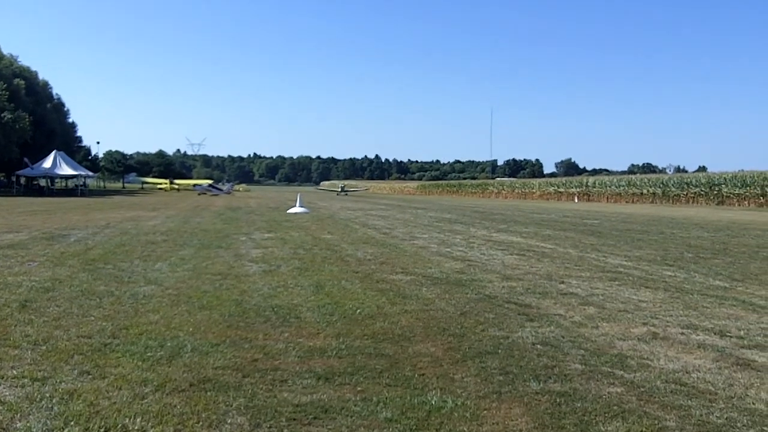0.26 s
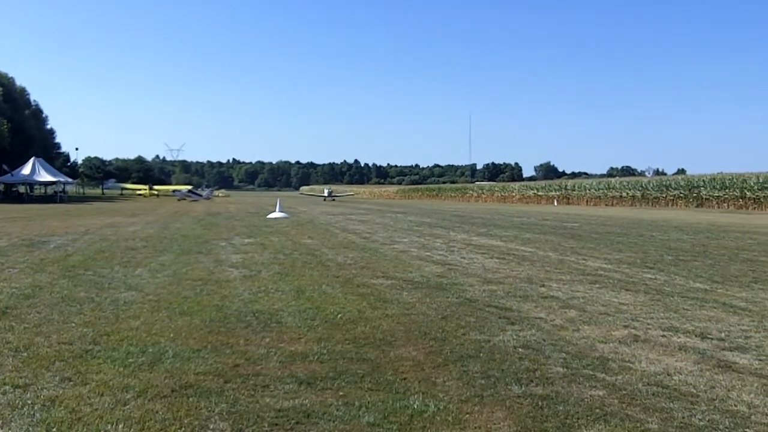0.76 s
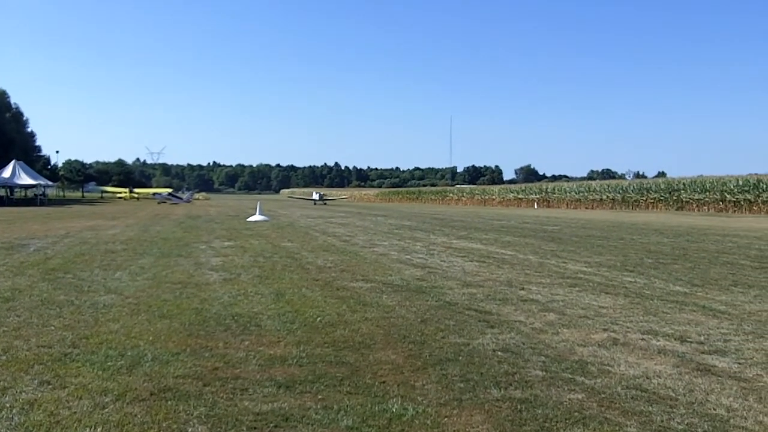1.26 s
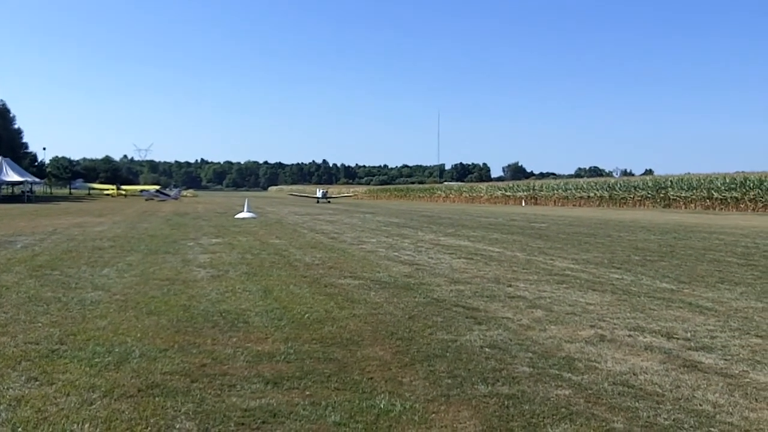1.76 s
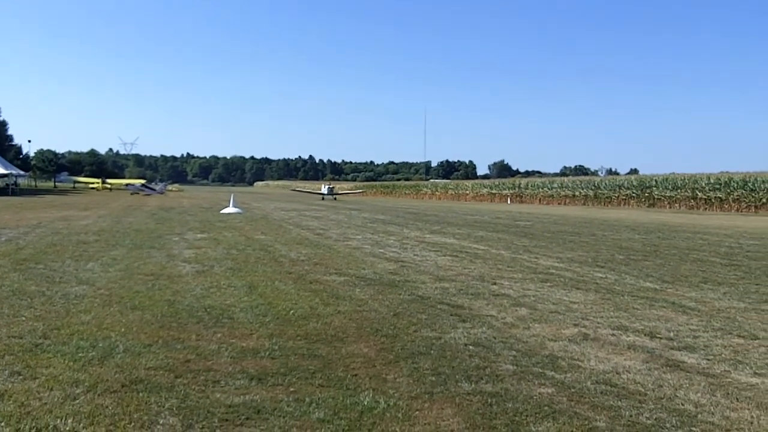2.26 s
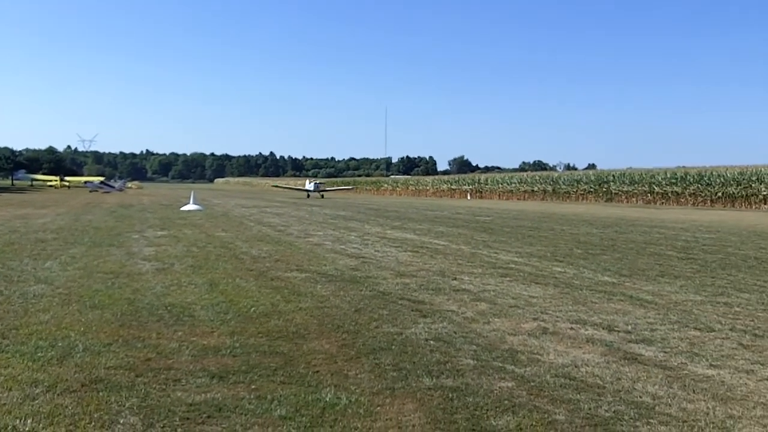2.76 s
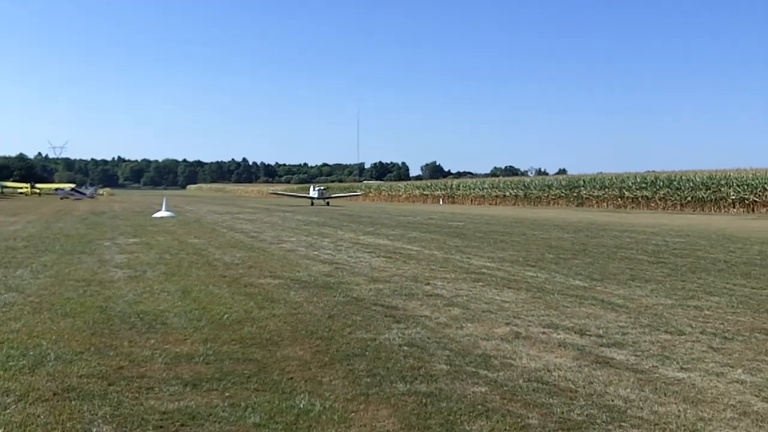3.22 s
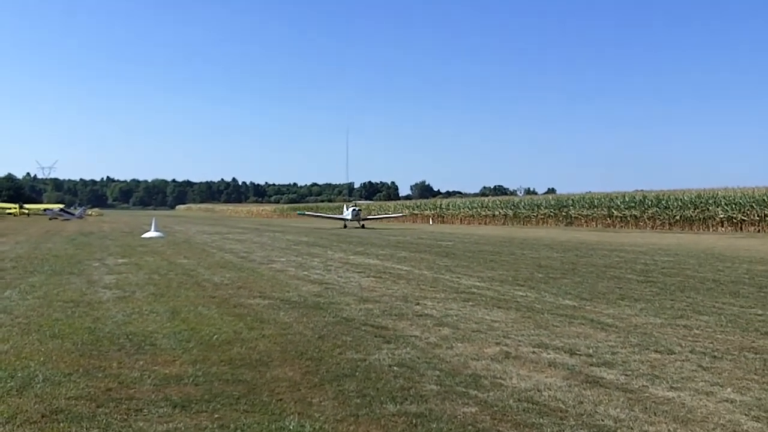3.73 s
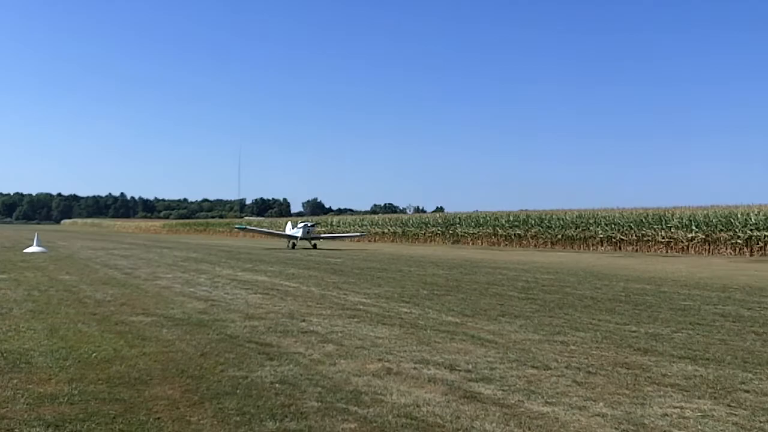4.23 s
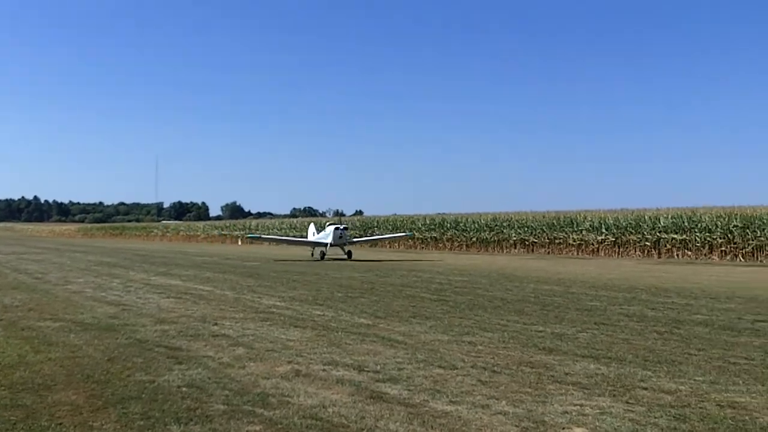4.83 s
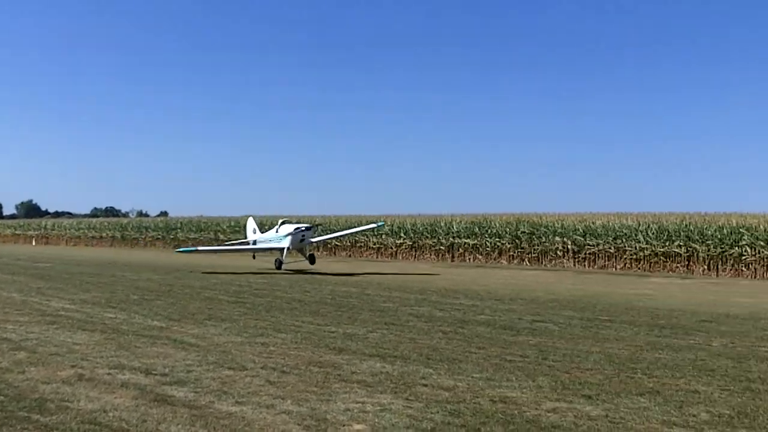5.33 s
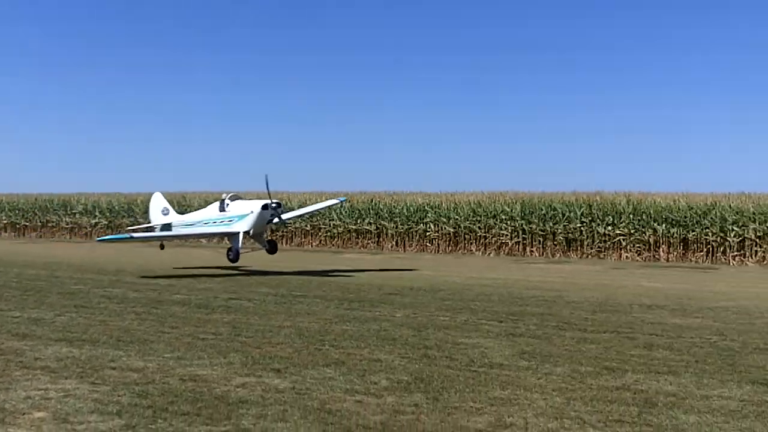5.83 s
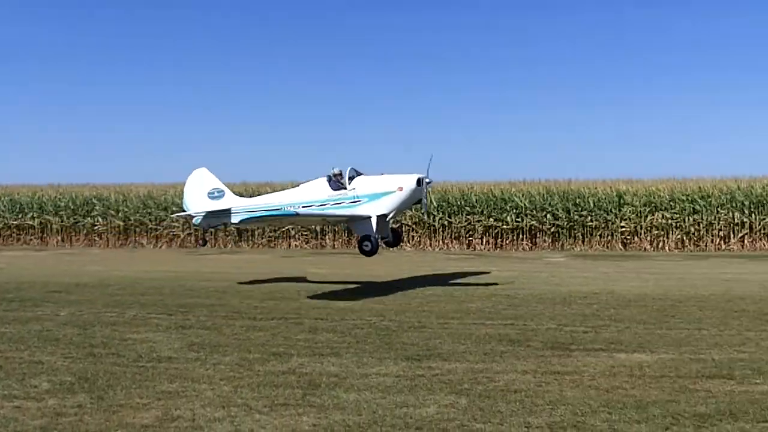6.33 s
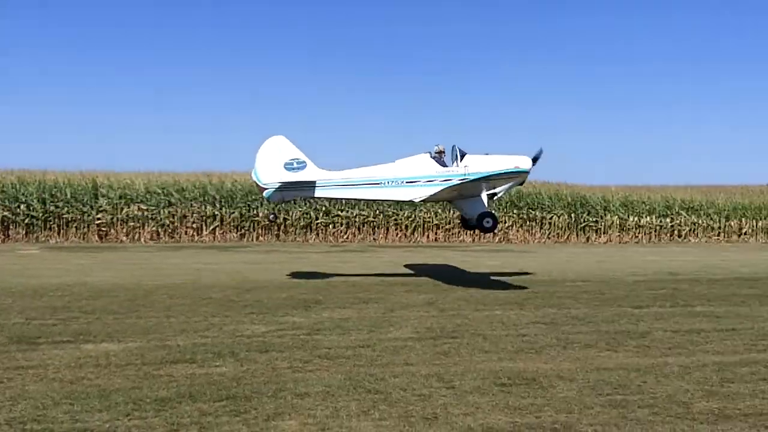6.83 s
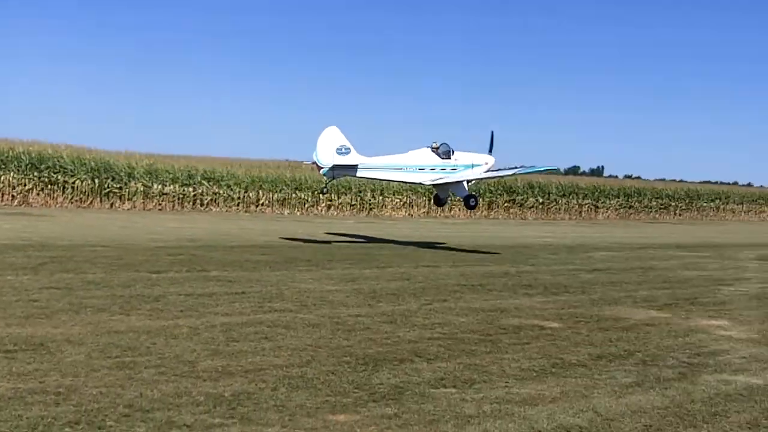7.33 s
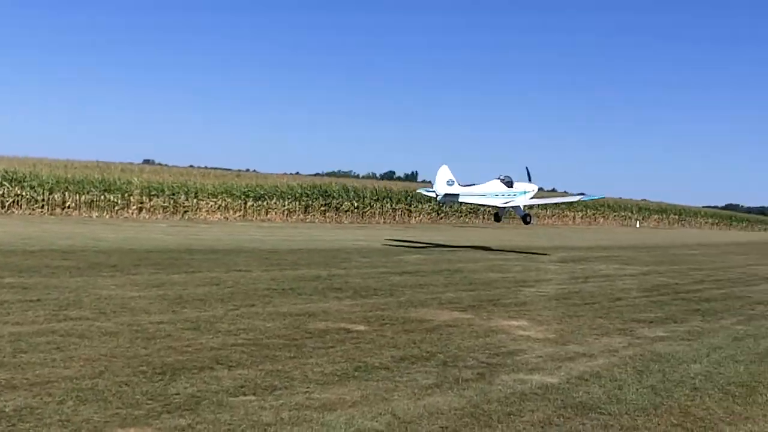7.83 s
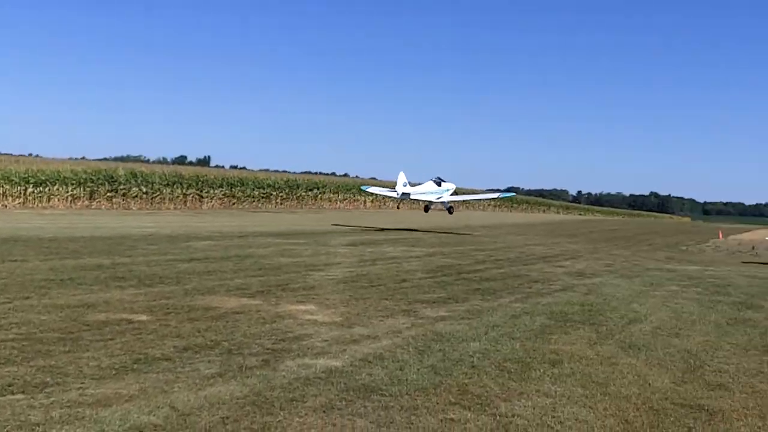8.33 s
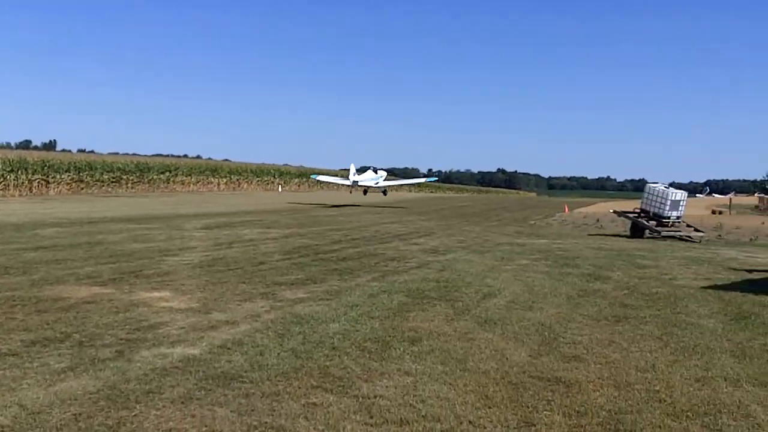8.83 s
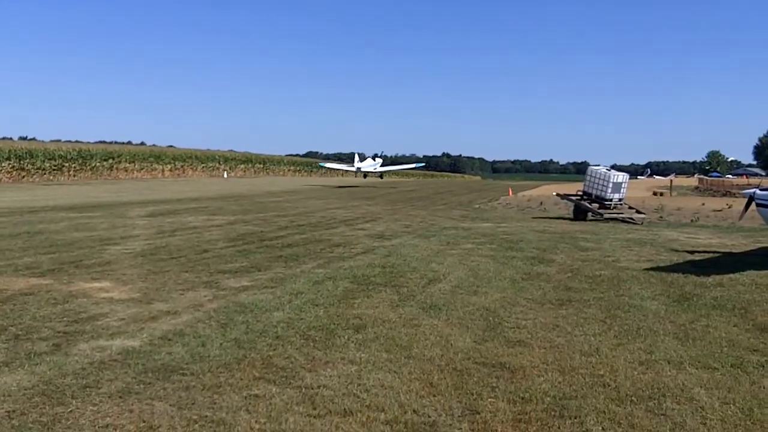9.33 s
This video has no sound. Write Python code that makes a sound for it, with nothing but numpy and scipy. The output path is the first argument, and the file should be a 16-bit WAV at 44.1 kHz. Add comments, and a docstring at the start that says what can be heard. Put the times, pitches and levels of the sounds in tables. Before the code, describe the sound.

Wind buffets the microphone as a light piston aircraft takes off, its buzzing engine swelling to a raspy pass, then receding with sharp exhaust cracks.

```python
"""A light propeller plane takes off from a grass strip, passes close by and climbs away.
Its four-cylinder engine drones in sine orders of the firing rate and rasps in puffs of filtered noise,
dropping in pitch as it passes; from behind, the open exhaust cracks in short shocks.
Wind rumbles and buffets on the microphone as shaped noise, and ticks sound close to it.
The propeller wash hits the microphone just after the pass."""
import sys
import numpy as np
from scipy import signal
from scipy.io import wavfile
from scipy.ndimage import uniform_filter1d, map_coordinates

SR = 44100
rng = np.random.default_rng(int(sys.argv[2]) if len(sys.argv) > 2 else 0)


def wav_out(sig):
    """Save sig, one row per channel (or a flat mono array), as 16-bit PCM at SR to the path in sys.argv[1]."""
    wavfile.write(sys.argv[1], SR, np.round(np.clip(np.atleast_2d(sig).T, -1, 1) * 32767).astype(np.int16))


N = 422037
TIME = np.arange(N) / SR

# Exhaust drone, swelling and fading on the wind.
# Each row: time in seconds, relative level of the firing tone in dB.
DRONE_SWELL = [(0, -26), (0.7, -30.5), (1.25, -22), (2.2, -27), (2.55, -20.5), (3, -20), (3.25, -22.5),
               (4.3, -22.5), (4.7, -30), (5, -25), (5.55, -23), (5.8, -26), (6.2, -23), (6.9, -22.5),
               (7.4, -29.5), (8, -28), (8.6, -30), (9.57, -27)]
# The four cylinders in firing order.
# Each row: relative strength heard from ahead in dB, from behind in dB.
CYLINDER_DB = [(2.5, 1), (-3, -3), (1, -3), (-1.5, -8)]
REST_HZ = 71  # firing rate that places the engine harmonics among the pipe resonances
NOTCH_HZ = 5500  # the microphone's notch, and where the treble of the rasp begins


def amp(db):
    """Turns decibels into a linear gain."""
    return 10 ** (np.asarray(db) / 20)


def evened(x):
    """Brings a sound to unit rms level."""
    return x / np.sqrt(np.mean(x ** 2) + 1e-20)


def steadied(x, size=10000):
    """Holds a sound at unit level over about size samples."""
    power = uniform_filter1d(uniform_filter1d(x ** 2, size), size // 2)
    return x / np.sqrt(abs(power) + 1e-12)


def follow(rows):
    """Each column of a curve, sample by sample."""
    s, *columns = np.transpose(rows)
    return [np.interp(TIME, s, column) for column in columns]


def add(mix, s, sound):
    """Lays a short sound into the mix at s seconds."""
    part = mix[max(round(s * SR), 0):][:len(sound)]
    part += sound[:len(part)]


def band(x, hz, kind, order=2):
    """Butterworth filter of the given kind."""
    return signal.sosfilt(signal.butter(order, hz, kind, fs=SR, output="sos"), x)


def drift(hz):
    """Slow chance of unit size: a smooth curve through random knots, two to each period of hz."""
    knots = rng.standard_normal(4096)
    coarse = map_coordinates(knots, [TIME[::64] * hz * 2], order=3, mode="wrap")
    return evened(coarse).repeat(64)[:N]


def colour(x, points, size=16384):
    """Causal minimum-phase filter with the given spectrum."""
    f, db = np.transpose(points)
    log_hz = np.log(abs(np.fft.fftfreq(size, 1 / SR)) + 1)
    log_gain = np.log(amp(np.interp(log_hz, np.log(f), db)))
    spectrum = np.exp(np.conj(signal.hilbert(log_gain)))
    taps = np.fft.ifft(spectrum).real[:size // 2]
    return signal.oaconvolve(x, taps)[:len(x)]


def flight(pass_s=6.98, speed_m_per_s=22.5, miss_m=14.6):
    """A straight line past the listener: distance in m and aspect (0 nose, 1 side, 2 tail)."""
    along = speed_m_per_s * (TIME - pass_s)
    return np.hypot(along, miss_m), np.arctan2(miss_m, -along) / (np.pi / 2)


def seen(aspect, views):
    """Blends values spaced evenly from the nose round to the tail."""
    return np.interp(aspect, np.linspace(0, 2, len(views)), views)


def engine_turns():
    """Firings counted so far, the running sum of the firing rate."""
    # Firing rate as heard, with the Doppler fall. Each row: time in seconds, rate in Hz.
    firing_rate = [(0.0, 74.83), (1.0, 75.22), (2.0, 75.26), (3.0, 75.5), (4.0, 75.58), (5.0, 75.43),
                   (5.6, 75.7), (6.1, 74.91), (6.5, 73.22), (6.9, 70.43), (7.3, 68.36), (7.7, 67.79),
                   (8.2, 67.15), (8.8, 66.7), (9.57, 66.52)]
    return np.cumsum(follow(firing_rate)[0]) / SR - .57


def firings(turns, aspect, scatter_db=2.5):
    """Strength of the current firing: the cylinders are uneven, more so from behind."""
    firing = np.floor(turns).astype(int)
    ahead_db, behind_db = np.array(CYLINDER_DB)[firing % len(CYLINDER_DB)].T
    cylinder_db = ahead_db + (behind_db - ahead_db) * np.clip(aspect - 1, 0, 1)
    return amp(cylinder_db + scatter_db * rng.standard_normal(1024)[firing])


def ground(x, soft_hz=350, dull_hz=7800):
    """The grass returns an inverted copy, latest near the pass; its comb sweeps down and up again."""
    # Echo off the grass after lift-off.
    # Each row: time in seconds, first null of its comb in Hz, strength 0 to 1.
    grass_echo = [(5.8, 5200, 0), (6.1, 3630, 0.02), (6.35, 2600, 0.17), (6.6, 1710, 0.3), (7.0, 1350, 0.3),
                  (7.25, 1400, 0.36), (7.5, 1610, 0.4), (7.8, 2130, 0.23), (8.0, 2760, 0.51),
                  (8.3, 4170, 0.4), (8.6, 5740, 0.22), (9.57, 7950, 0.06)]
    null_hz, share = follow(grass_echo)
    echo = signal.filtfilt(*signal.butter(1, [soft_hz, dull_hz], "band", fs=SR), x)
    delayed = map_coordinates(echo, [(TIME - 1 / null_hz) * SR], order=3)
    return x - share * delayed


def drone(turns, aspect, level_db=-0.05, waver=0.069, overtone_waver=0.17, lag=0.37):
    """Low engine orders as wavering sines; the second swells as the pipes come to face the listener."""
    # Each row: multiple of the firing rate, level ahead of the plane in dB, level behind it in dB.
    orders = [(.5, -41, -41), (1, 0, -0.5), (1.5, -16.5, -24), (2, -14, 2), (2.5, -30, -11.5),
              (3, -31.5, -7), (3.5, -43, -26.5), (4, -39.5, -28)]
    behind = np.clip(aspect - 1, 0, 1)
    out = np.zeros(N)
    for multiple, ahead_db, behind_db in orders:
        depth = waver if multiple == 1 else overtone_waver
        unsteady = 1 + depth * (drift(4.5) + 1j * drift(5.9))
        tone = (unsteady * np.exp(2j * np.pi * multiple * (turns - lag))).real
        out += amp(ahead_db + (behind_db - ahead_db) * behind) * tone
    return np.sqrt(2) * out * amp(follow(DRONE_SWELL)[0] + level_db)


def pipes(turns, aspect, distance, half_orders_db=-5, throb=0.63, lag=0.26, wander_db=1.8, count=46):
    """Engine harmonics, lifted by the pipes, glide with the Doppler fall; uneven firing and air blur them."""
    # Resonances of the exhaust pipes with the engine firing at REST_HZ.
    # Each row: centre in Hz, width in Hz, loss over the grass in dB per m,
    # then dB against the drone every 30 degrees from nose to tail.
    pipe_modes = [(400, 110, 0.054, -37, -33, -30, -38, -34, -33, -41),
                  (550.5, 118, 0.063, -23.5, -24.5, -20.5, -27, -18, -16, -27),
                  (676, 150, 0.074, -37.5, -31, -20, -25, -30, -24, -42),
                  (1000, 168, 0, -34.5, -24, -19, -18.5, -15.5, -13.5, -20.5),
                  (1540, 370, 0, -36.5, -28.5, -23, -25, -18, -18.5, -30)]
    near = np.clip(aspect, 0, 1)
    drone_db = follow(DRONE_SWELL)[0]
    levels = amp([drone_db + seen(aspect, views) - loss * distance + wander_db * drift(0.99)
                  for _, _, loss, *views in pipe_modes])

    # share of each harmonic in each resonance, from 4.5 times the firing rate upwards in halves
    multiples = (9 + np.arange(count)) / 2
    hz, width = np.transpose(pipe_modes)[:2]
    off_centre = (multiples[:, None] * REST_HZ - hz) / width
    lift = amp(half_orders_db * (multiples % 1 > 0))[:, None] / (1 + off_centre ** 2) ** 2
    lift = lift / np.linalg.norm(lift, axis=0)

    half_turn = np.exp(1j * np.pi * turns)
    harmonic = np.exp(8j * np.pi * turns)
    out = np.zeros(N)
    for multiple, weights in zip(multiples, lift):
        harmonic = harmonic * half_turn
        # higher harmonics are less pure and flicker faster
        clean = np.minimum((4.3 + 2.2 * near) / multiple, .8)
        blur_hz = 10 + 1.8 * multiple
        steady = clean * np.exp(2j * np.pi * rng.random())
        blur = np.sqrt((1 - clean ** 2) / 2) * (drift(blur_hz) + 1j * drift(blur_hz))
        out += (weights @ levels) * ((steady + blur) * harmonic).real
    # close by and from behind, the single firings stand out
    return np.sqrt(2) * out * (1 + throb * near * np.cos(2 * np.pi * (turns - lag)))


def jets(turns, aspect, sharpness=1.96, low_hz=5500, scatter_db=2.5):
    """Every firing spits a bright jet of gas; uneven cylinders chop the hiss once an engine cycle."""
    # Each row is one cylinder in firing order: relative dB every 30 degrees from nose to tail.
    cylinder_jets = [(2, 5, 2, -7.5, -11, 1.5, 2), (-1, 1.5, 2, -9, -8, 0.5, 3),
                     (-1, -0.5, -3, 2, 2, -2, -7), (0, 0, 1, 3, 4.5, -1.5, 0)]
    # Relative level of all the jets in dB, every 30 degrees from nose to tail.
    jet_level = (-11.5, -1, 2, 4.5, 4.5, 0.5, -7)
    # How long a jet trails its firing in firing periods, every 30 degrees from nose to tail.
    jet_lag = (0.32, 0.41, 0.34, 0.13, 0.035, .2, .2)
    own = turns - seen(aspect, jet_lag)
    firing = np.round(own).astype(int)
    cylinder_db = np.choose(firing % len(cylinder_jets), [seen(aspect, views) for views in cylinder_jets])
    chance_db = scatter_db * rng.standard_normal(1024)[firing]
    level = amp(seen(aspect, jet_level) + cylinder_db + chance_db)
    pulse = np.exp(sharpness * (np.cos(2 * np.pi * own) - 1))
    return level * pulse * band(rng.standard_normal(N), low_hz, "high", order=1)


def swelling(x, spread=1.19):
    """The roar swells or fades for a moment in one band, then evens out again."""
    # Each row: centre in seconds, half length in seconds, centre in Hz, lift of the band in dB.
    swells = [(1.12, .13, 1000, 6), (1.7, 0.16, 1640, 8), (3.05, 0.39, 1080, 4), (4.2, .22, 960, -11),
              (4.42, 0.1, 4960, 6), (4.6, 0.23, 9600, 3), (5.4, 0.2, 1040, 2), (5.9, 0.17, 3600, 0),
              (6.333, 0.1, 1600, 1.5), (6.747, 0.089, 2260, 1.5)]
    edges = spread ** np.array([-1, 1])
    out = x.copy()
    for s, half, hz, db in swells:
        moment = np.exp(-((TIME - s) / half) ** 2 / 2)
        out += (amp(db) - 1) * moment * band(x, hz * edges, "band", order=1)
    return out


def rasp(turns, aspect, distance, strength, level_db=-.5, flutter_db=0.93, air_db_per_m=0.07):
    """Each firing lets out a thump and a puff of hiss, over the steady rush of the propeller."""
    # Exhaust rasp and propeller rush. Each row: time in seconds, relative level in dB.
    rasp_level = [(0, -50.5), (0.3, -48.5), (0.52, -56), (0.68, -51), (0.84, -52.5), (1.2, -46.5),
                  (1.45, -49.5), (1.72, -47), (2.03, -54), (2.4, -47), (2.68, -44), (2.8, -48.5),
                  (3.1, -43.5), (3.45, -49), (3.64, -51), (3.88, -44.5), (4.02, -46.5), (4.35, -45.5),
                  (4.68, -51), (4.85, -47.5), (5.22, -35.5), (5.4, -38), (5.56, -33.5), (5.8, -32),
                  (5.92, -37), (6.05, -32), (6.3, -35.5), (6.8, -35), (7.1, -38.5), (7.4, -39.5),
                  (8.5, -35.5), (9.0, -35), (9.22, -38), (9.4, -33), (9.57, -37)]
    # Colour of the rasp from the nose, the side and the tail. Each row: frequency in Hz, level in dB.
    from_nose = [(200, -3.5), (370, -21.5), (570, -5.5), (780, -11), (1000, -1.5), (1330, -3), (1650, -2),
                 (2500, -1.5), (4200, -6.5), (5000, -9.5), (7000, -7), (10000, -24.5), (14000, -38)]
    from_side = [(200, 13.5), (370, -7.5), (570, -1.5), (800, -12.5), (1000, 1), (1400, -1.5), (2200, 2),
                 (3100, -4), (4200, -2.5), (5000, -9.5), (7000, -5.5), (10000, -15.5), (14000, -37)]
    from_tail = [(200, -4), (370, -24), (570, -2), (760, -31), (960, -1), (1250, -2.5), (2000, 3),
                 (2800, 0), (4200, -5), (5000, -7.5), (7000, -2), (10000, -20), (14000, -43)]
    # Relative treble of the rasp in dB, every 30 degrees from nose to tail.
    treble_views = (11.5, 5.54, 3.4, 2.1, 4, 0.68, 5.3)

    # rise and fall of a puff in firing periods
    rise, fall_ahead, fall_near = 0.1, 0.32, 0.25
    age = turns % 1
    fall = fall_ahead + (fall_near - fall_ahead) * np.clip(aspect, 0, 1)
    puff = strength * np.minimum(age / rise, 1) ** 2 * np.exp(-np.maximum(age - rise, 0) / fall)

    rush_db = (0, -5, -11, -13, -12, -12, -5)  # every 30 degrees from nose to tail
    rush = amp(seen(aspect, rush_db)) * band(rng.standard_normal(N), 8000, "low", order=1)
    pulses = np.diff(np.floor(turns - rise), prepend=-1) * strength
    puffs = band(puff * rng.standard_normal(N), 8000, "low", order=1)
    hiss = puffs + rush + jets(turns, aspect)
    drive = steadied(hiss) + 0.1 * band(steadied(pulses), 900, "low")

    # the colour turns with the plane
    views = enumerate([from_nose, from_side, from_tail])
    sound = ground(sum(np.maximum(1 - abs(aspect - k), 0) * colour(drive, view) for k, view in views))
    # the middle of the spectrum is held at unit level
    body = band(sound, np.array([1200, 4800]), "band", order=3)
    sound = sound / np.sqrt(uniform_filter1d(body ** 2, size=10000))

    # the treble is thrown forwards, and the air takes it away with distance
    highpass = signal.firwin(41, NOTCH_HZ, pass_zero=False, fs=SR)
    treble = signal.oaconvolve(sound, highpass, "same")
    treble_gain = amp(seen(aspect, treble_views) - air_db_per_m * distance)
    sound = sound + treble * (treble_gain - 1)
    return swelling(sound) * amp(follow(rasp_level)[0] + level_db + flutter_db * drift(10))


def wind(level_db=3.5, eddy_db=1.9, eddy_hz=4):
    """Slow eddies press on the microphone: noise with a deep rumbling colour and a drifting level."""
    # Strength of the wind on the microphone. Each row: time in seconds, relative level in dB.
    wind_level = [(0, -25), (0.36, -17.5), (0.55, -28.5), (0.72, -19), (0.95, -29), (1.2, -24),
                  (1.4, -25.5), (1.6, -21), (1.75, -23.5), (1.9, -20), (2.08, -25), (2.45, -28), (2.9, -31),
                  (3.2, -23.5), (3.58, -23), (4.1, -25.5), (4.55, -21.5), (4.85, -26), (5.8, -26.5),
                  (6.5, -39), (6.85, -39), (7.1, -26), (8.15, -38.5), (8.5, -35), (9.57, -31.5)]
    # Colour of the wind's rumble. Each row: frequency in Hz, level in dB.
    rumble = [(5, -4.5), (15, 3), (30, 1), (50, -3), (80, -12), (120, -14.5), (180, -27), (280, -38.5),
              (500, -49.5), (1200, -94.5)]
    eddies = colour(rng.standard_normal(N), rumble)
    return steadied(eddies, size=6000) * amp(follow(wind_level)[0] + level_db + eddy_db * drift(eddy_hz))


def turbulence(lump_db=3.5, lump_hz=50):
    """Lumpy air tumbling over the microphone."""
    # Colour of the turbulence. Each row: frequency in Hz, level in dB.
    buffet = [(30, -10.5), (80, 5), (150, 4.5), (300, -3), (1500, -7.5)]
    return colour(rng.standard_normal(N), buffet) * amp(lump_db * drift(lump_hz))


def gusts():
    """Brief bursts of turbulence, each swelling and dying below its own upper edge."""
    # Strongest gusts that buffet the microphone, from 7.2 to 8.2 s the propeller wash.
    # Each row: centre in seconds, level in dB, half length in seconds, upper edge in Hz.
    gust_list = [(0.322, -15, 0.014, 40), (0.379, -24.5, 0.018, 416), (0.426, -15, .016, 45),
                 (0.443, -27, 0.007, 446), (1.384, -24, 0.011, 280), (1.882, -27, 0.054, 270),
                 (1.905, -24, 0.0098, 476), (1.964, -26, 0.014, 420), (2.235, -29, 0.0094, 258),
                 (2.714, -17.5, 0.027, 44.6), (3.174, -24, 0.033, 223), (3.34, -28, .015, 274),
                 (4.459, -26, 0.006, 400), (4.569, -12.5, 0.025, 35), (4.732, -16.5, .02, 40),
                 (4.969, -29, 0.021, 230), (5.363, -32, 0.014, 376), (7.067, -24.5, 0.012, 279),
                 (7.239, -20.5, 0.014, 436), (7.318, -21.5, 0.028, 584), (7.276, -25.5, .012, 650),
                 (7.388, -24, 0.024, 520), (7.472, -24.5, 0.028, 600), (7.613, -24.5, 0.036, 520),
                 (7.731, -22.5, 0.026, 477), (7.876, -25.5, 0.037, 450), (8.031, -27.5, 0.022, 400),
                 (8.108, -25.5, 0.033, 400), (8.347, -30, 0.015, 330), (8.41, -29, 0.012, 330),
                 (8.635, -24, 0.014, 368), (8.803, -21.5, 0.031, 375), (8.952, -19.5, 0.023, 350),
                 (9.184, -24, 0.0073, 350)]
    out, air = np.zeros(N), turbulence()
    for s, db, half, hz in gust_list:
        near = abs(TIME - s) < 4 * half + .15
        swell = np.exp(-((TIME[near] - s) / half) ** 2 / 2)
        burst = band(air[near] * swell, hz, "low", order=3)
        out[near] += amp(db) * evened(burst) * np.sqrt(np.mean(swell ** 2))
    return out


def thumps():
    """A single eddy strikes the microphone with one push or pull."""
    # Each row: centre in seconds, peak pressure as a share of full scale, half length in seconds.
    eddy_list = [(.363, 0.8, 0.0028), (0.375, -.1, 0.00068), (1.38, -0.42, 0.0014), (1.783, 0.33, 0.0022),
                 (1.936, -.42, .0008), (1.9372, 0.24, 0.00087), (2.233, -0.3, .0014), (3.2, -0.3, .0018),
                 (3.895, .35, .007), (4.464, -0.33, .0012), (4.542, 0.54, 0.0019), (4.731, -0.12, 0.0011),
                 (5.845, .25, .007), (7.171, 0.22, 0.0015), (8.952, 0.2, .0013)]
    out = np.zeros(N)
    for s, push, half in eddy_list:
        out += push * np.exp(-np.minimum(((TIME - s) / half) ** 2 / 2, 20))
    return out


def ticks(level_db=1.5, decay_s=0.0013):
    """Dry little clicks with no ring: noise that dies away at once."""
    # Small ticks close to the microphone. Each row: start in seconds, relative peak in dB.
    tick_list = [(4.125, -27.5), (4.165, -30), (4.17, -19.5)]
    # Colour of a tick. Each row: frequency in Hz, level in dB.
    tick_colour = [(600, -11), (2000, 5), (4000, -5), (7500, 5), (11000, -15), (15000, -23)]
    out, t = np.zeros(N), np.arange(500) / SR
    for s, db in tick_list:
        tick = colour(rng.standard_normal(len(t)) * np.exp(-t / decay_s), tick_colour, size=512)
        add(out, s, amp(db + level_db) * tick / abs(tick).max())
    return out


def cracks(turns, level_db=-1.0, decay_s=0.002, spit=0.14, spread=1.42, lead_s=0.00031, top_hz=5000, lag=0.111):
    """A hard firing steepens into a small shock, followed by a spit of gas."""
    # Loudest exhaust cracks. Each row: time in seconds, relative peak in dB, centre in Hz.
    loud_cracks = [(5.7957, -10, 2230), (5.956, -21, 1750), (6.2763, -17.5, 1350), (6.3333, -15, 1450),
                   (6.384, -17.5, 1580), (6.439, -16, 1700), (6.466, -20, 1400), (6.7134, -17, 2260),
                   (6.8528, -20, 2140), (7.4599, -13, 1090), (7.6356, -11.5, 1200), (7.6949, -16.5, 1000),
                   (7.754, -20, 1300), (7.783, -17, 1250), (7.8728, -14, 1000), (7.901, -17.5, 1150),
                   (7.932, -19, 1300), (7.9613, -16, 1150), (7.9903, -10, 1660), (8.0198, -16, 1300),
                   (8.0505, -10, 1820), (8.08, -12.5, 1200), (8.1397, -15.5, 1400), (8.1695, -15.5, 2000),
                   (8.229, -12, 1770), (8.2586, -16, 1650), (8.348, -9, 2060), (8.3773, -18, 1610),
                   (8.4079, -13.5, 1900), (8.4385, -15, 1750), (8.4674, -12, 2580), (8.5277, -8, 2400),
                   (8.5574, -11.5, 2340), (8.5866, -10.5, 2780), (8.6163, -17, 1700), (8.6474, -19, 1700),
                   (8.767, -18, 1930), (8.8269, -10, 2500), (8.8872, -7.5, 2280), (8.947, -13, 2050),
                   (9.0077, -15, 1900), (9.0673, -9, 2960), (9.1273, -16, 2010), (9.1867, -19, 1400),
                   (9.3668, -12.5, 1900), (9.427, -13, 1950), (9.489, -12, 2280), (9.548, -18, 2180)]
    # Lesser cracks of the other firings, which brighten and fade as the plane draws away.
    # Each row: time in seconds, relative peak in dB, centre in Hz.
    crackle = [(7.5, -22.5, 965), (7.95, -20, 1300), (8.5, -21, 2210), (9.1, -25, 2200)]
    crackle_from_s, crackle_scatter_db = 7.5, 2.5

    starts = np.flatnonzero(np.diff(np.floor(turns - lag)) > 0) + 1
    firing_rows = np.array([TIME, turns, *follow(crackle)])[:, starts].T
    lesser = []
    for (s, turn, db, hz), chance in zip(firing_rows, rng.standard_normal(1024)):
        # a firing that already cracks loudly gets no lesser crack
        apart = min(abs(s - loud_s) for loud_s, _, _ in loud_cracks) > .5 / REST_HZ
        if s > crackle_from_s and apart:
            behind_db = CYLINDER_DB[int(turn - lag) % len(CYLINDER_DB)][1]
            lesser.append((s, db + behind_db + crackle_scatter_db * chance, hz))

    out, t = np.zeros(N), np.arange(1000) / SR
    for s, db, hz in list(loud_cracks) + lesser:
        gas = spit * rng.standard_normal(len(t)) * np.exp(-t / decay_s)
        shock = -np.exp(-t * 2 * np.pi * hz) * 2
        crack = band(shock + gas, hz * spread ** np.array([-1, 1]), "band", order=1)
        crack = band(crack, top_hz, "low")
        add(out, s - lead_s, amp(db + level_db) * crack / abs(crack).max())
    return ground(band(out, 500, "high"))


def scene():
    """The plane and the wind, alike in both channels."""
    turns = engine_turns()
    distance, aspect = flight()
    strength = firings(turns, aspect)
    plane = drone(turns, aspect) + ground(pipes(turns, aspect, distance))
    plane = plane + rasp(turns, aspect, distance, strength)
    mix = plane + wind() + gusts() + thumps() + ticks() + cracks(turns)
    return np.array([mix, mix])


def record(dry, notch_width_hz=1600, first_channel_db=0.0161, edge_hz=15200):
    """The microphone has a deep notch in the treble; then the band limit, with nearly equal channels."""
    notch = signal.iirnotch(NOTCH_HZ, NOTCH_HZ / notch_width_hz, SR)
    notched = signal.lfilter(*notch, dry) * amp([[first_channel_db], [0]])
    lowpass = signal.firwin(511, edge_hz, window=("kaiser", 9), fs=SR)
    return signal.oaconvolve(notched, lowpass[None], "same")


dry = scene()
out = record(dry)
wav_out(out)
```